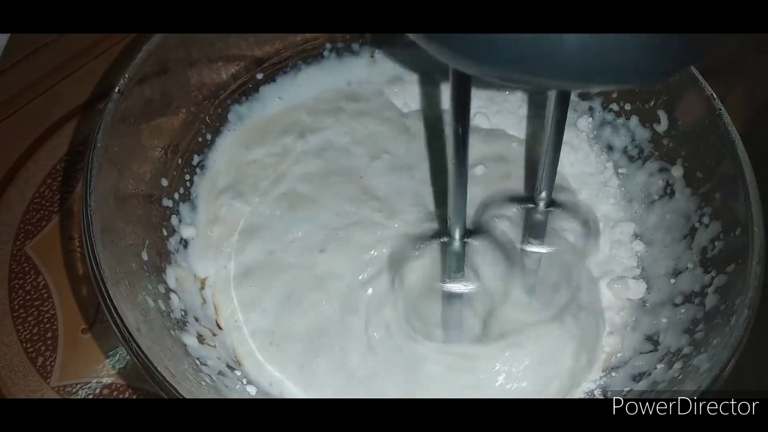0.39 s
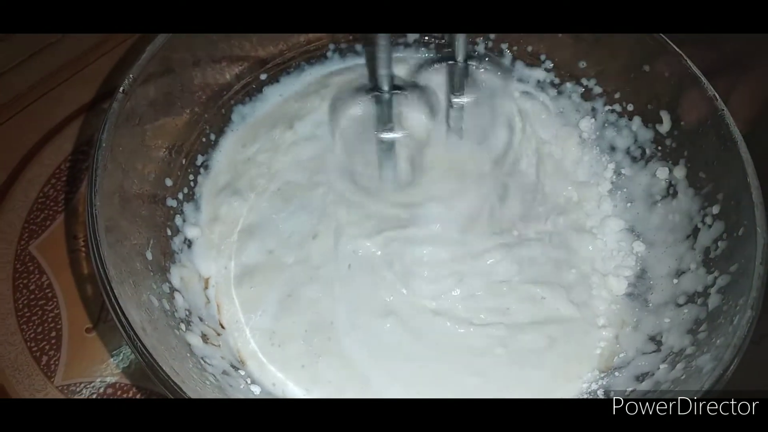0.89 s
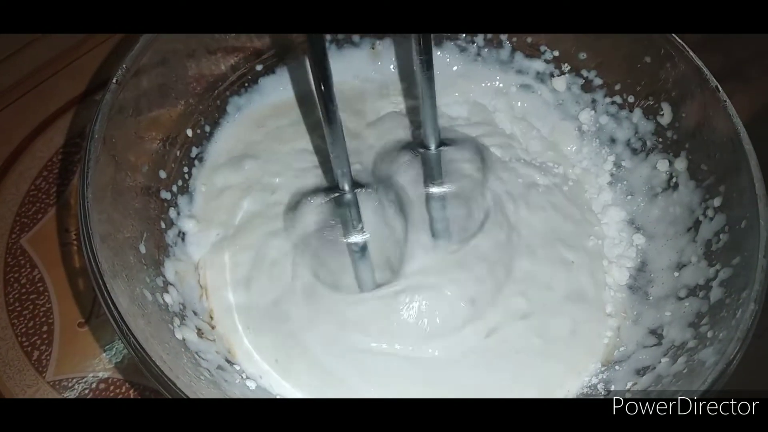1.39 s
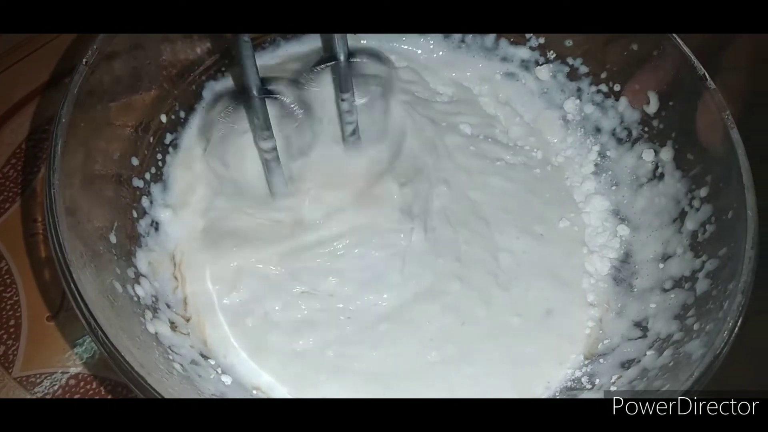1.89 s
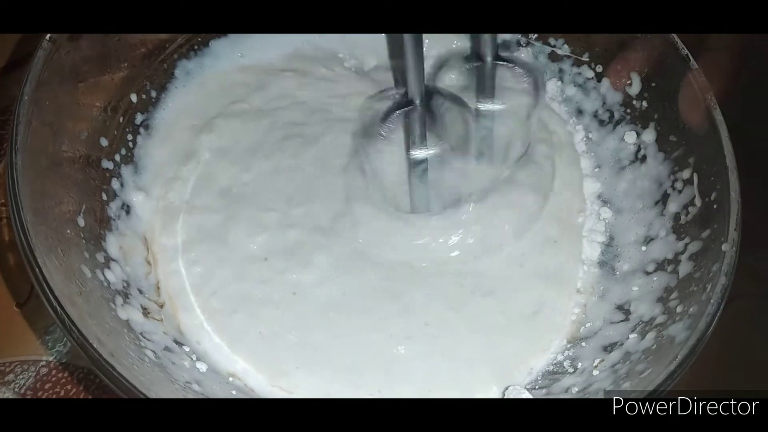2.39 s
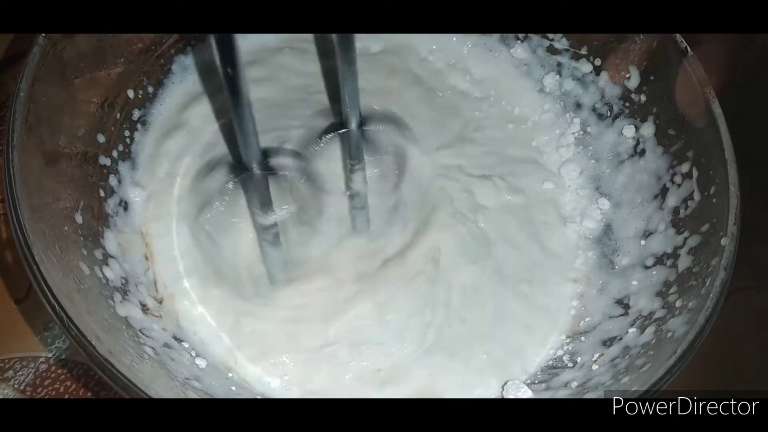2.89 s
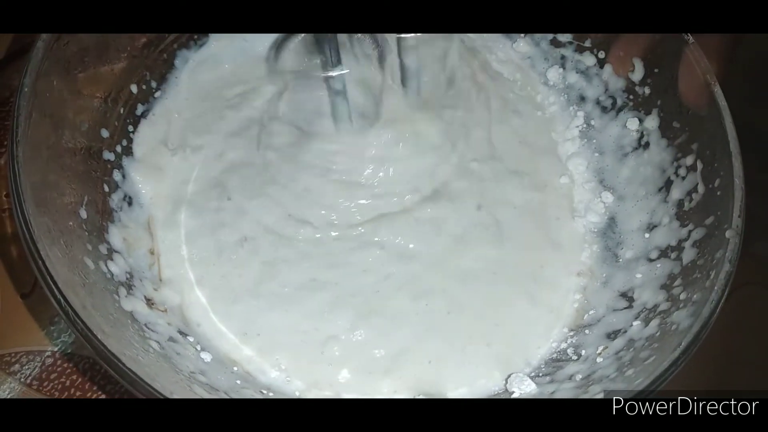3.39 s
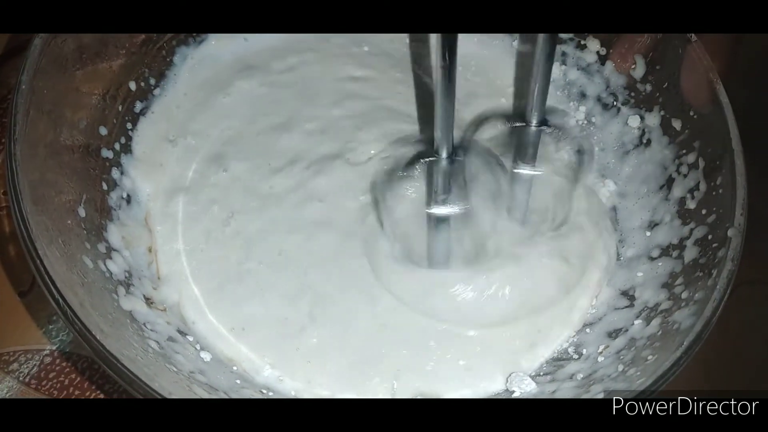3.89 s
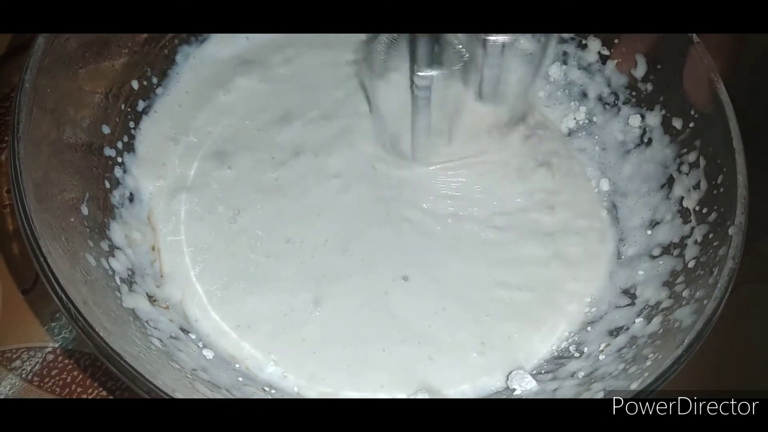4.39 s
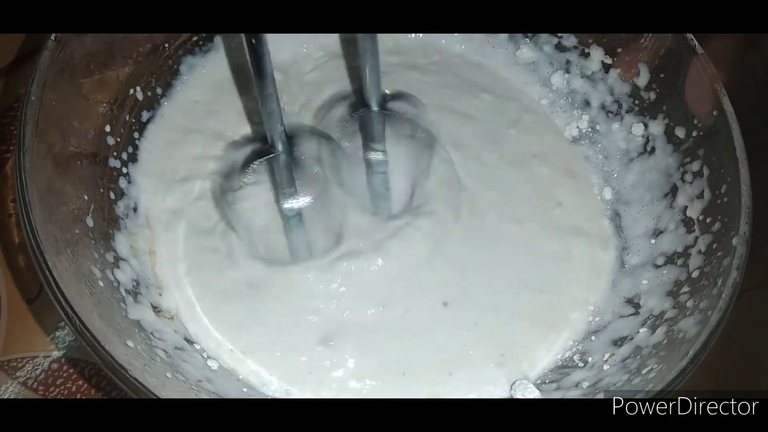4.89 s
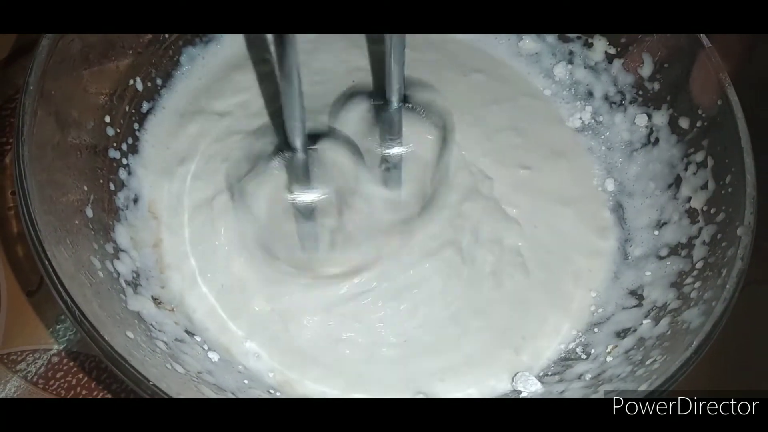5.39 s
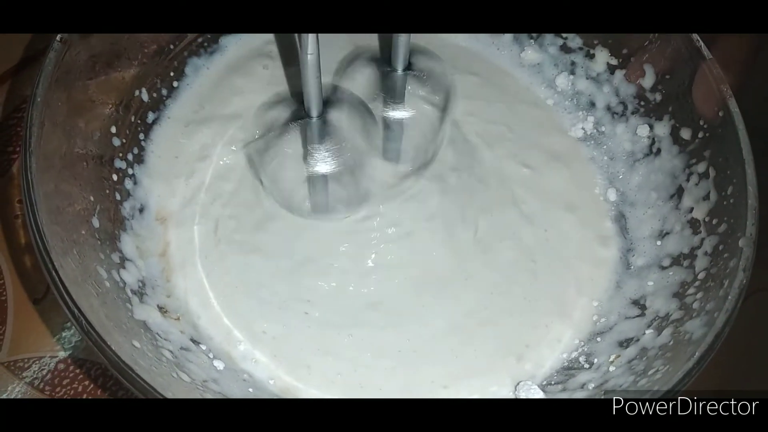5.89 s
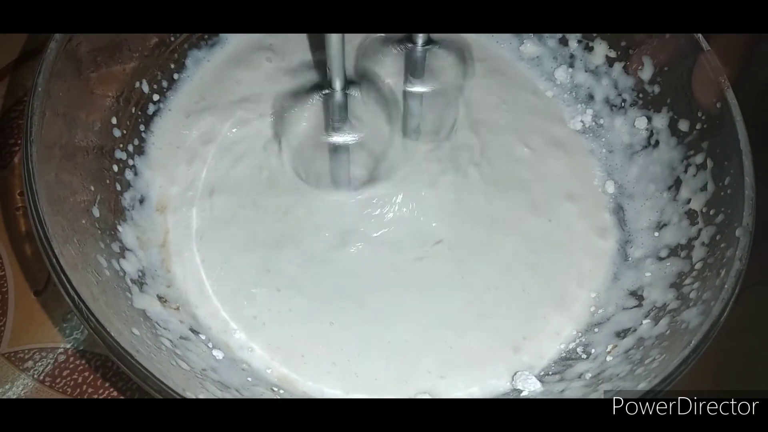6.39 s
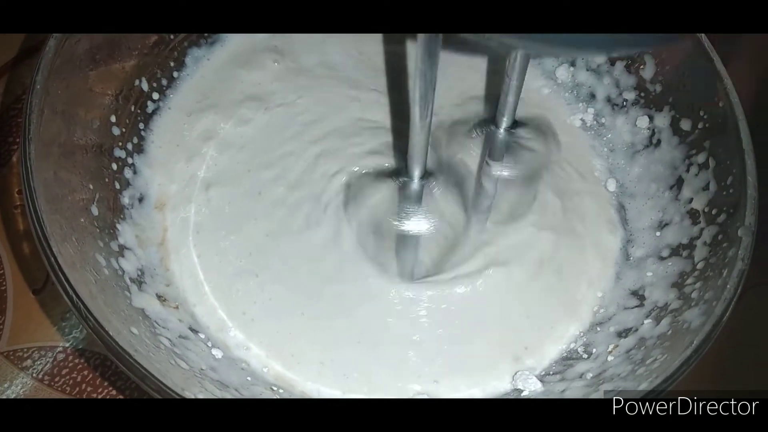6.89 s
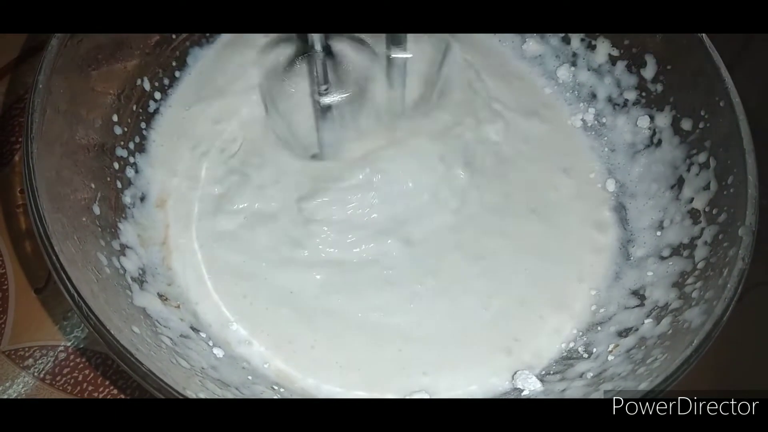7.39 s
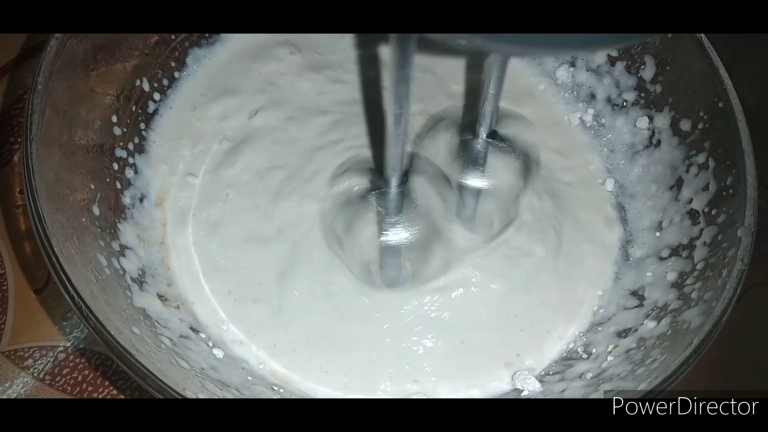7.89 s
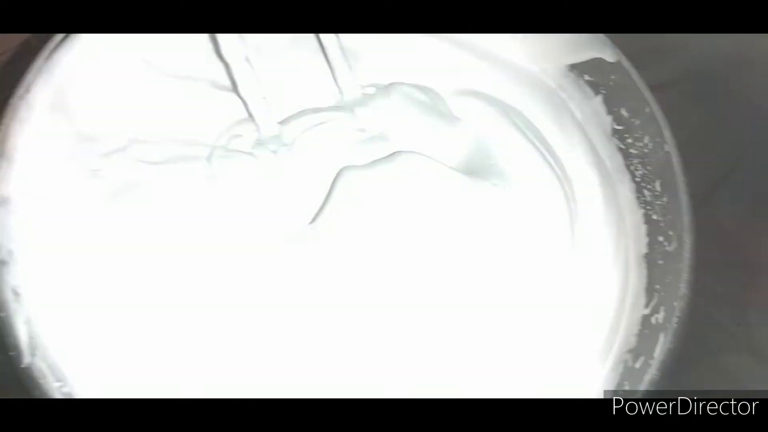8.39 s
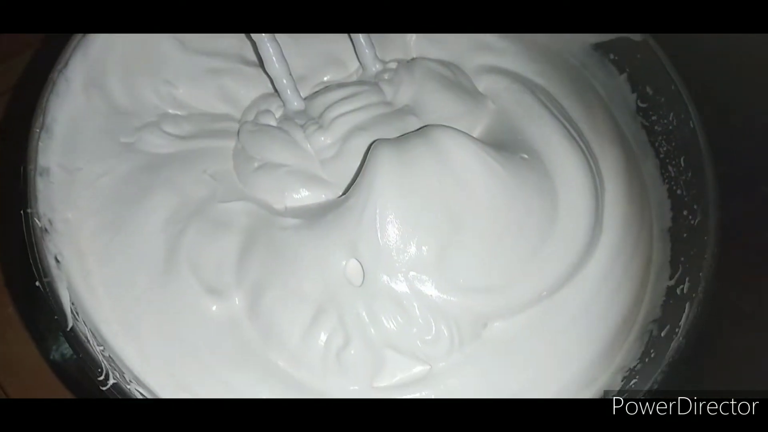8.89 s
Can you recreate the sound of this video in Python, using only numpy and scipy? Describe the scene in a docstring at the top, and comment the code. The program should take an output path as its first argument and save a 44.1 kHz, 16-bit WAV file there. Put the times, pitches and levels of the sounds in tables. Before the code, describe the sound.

Close electric mixer whirr with rapid beater rattle on a glass bowl, smoother whipping later, an abrupt stop, a silent gap, then quiet kitchen air.

```python
"""A kitchen: a hand mixer whips cream in a glass bowl close to a phone, then is cut to silence.
The motor is a stack of sines on shaft orders; cream, gears and fan are shaped noise.
Beater wires tick and knock on the glass (noise bursts, decaying modes) as the hand moves them round.
After the silence the quiet kitchen fades in: low-heavy noise on a slow pressure swing."""
import sys
import numpy as np
from scipy import signal
from scipy.fft import rfft, irfft, next_fast_len
from scipy.io import wavfile
from scipy.ndimage import uniform_filter1d, map_coordinates

SR = 44100
rng = np.random.default_rng(int(sys.argv[2]) if len(sys.argv) > 2 else 0)


def decibels_to_gain(level_db):
    """Convert a level in decibels to a linear amplitude gain (20 dB per decade)."""
    exponent = np.asarray(level_db, float) / 20
    return 10 ** exponent


def generate_wav(signal):
    """Clip the signal to [-1, 1] and save it as 16-bit WAV at the path in sys.argv[1]."""
    frames = np.transpose(np.atleast_2d(signal))
    scaled = np.clip(frames, -1, 1) * 32767
    pcm = np.round(scaled).astype(np.int16)
    wavfile.write(sys.argv[1], SR, pcm)


N = 397770
CUT_S, BACK_S = 8.112, 8.503  # mixer cut, kitchen in
GEAR = 20  # shaft turns per beater turn

# motor shaft speed: (t/s, f/Hz)
MOTOR_HZ = [(0, 316.5), (1.55, 316.8), (2.08, 313.8), (2.6, 314.4), (3.3, 312), (3.6, 312.6), (3.85, 311.6),
            (4.1, 312.8), (4.45, 316), (5.05, 312.5), (5.55, 310.5), (6.08, 312), (6.6, 318.3),
            (7.05, 319.4), (8.1, 318.9)]
# how hard the beaters stir: (t/s, level/dB)
STIR_DB = [(0, 0.5), (.35, 1), (.9, 2), (1.2, 0.5), (1.8, 0.5), (2.5, 1.5), (3, 0), (3.8, 0.5), (4.1, 3),
           (4.47, 2.5), (4.7, 0.5), (5.3, 2), (5.55, -.5), (5.9, -1.5), (6.5, -1), (7.05, 0.5), (8.1, 1)]
# left-right likeness of the mixer's noises: (f/Hz, correlation)
MIXER_ALIKE = [(60, 0.77), (150, 0.88), (380, 0.23), (950, 0.53), (2000, 0.64), (3000, 0.12), (6000, 0.14),
               (15000, .1)]
# glass bowl modes: (f/Hz, level/dB, t60/s)
BOWL_MODES = [(448, -12.5, 0.039), (540, 5.5, 0.072), (717, 1.5, 0.032), (821, 4, 0.046),
              (1124, 2.5, 0.026), (1294, -4.5, 0.029), (1527, 0, 0.041), (2083, -9, 0.043)]


def unit(x):
    """Scaled to rms 1."""
    return x / np.sqrt(np.mean(x ** 2) + 1e-20)


def along(points, hz):
    """(f/Hz, value) points interpolated on a log axis."""
    f, v = np.transpose(points)
    return np.interp(np.log(hz + 1), np.log(f + 1), v)


def curves(rows):
    """One value per sample for each column after the time."""
    s, *cols = np.transpose(rows)
    return [np.interp(np.arange(N) / SR, s, c) for c in cols]


def wobble(rate):
    """A smooth random curve, rate knots a second."""
    coarse = np.arange(0, N + 64, 64)
    knots = rng.standard_normal(int(N * rate / SR) + 4)
    return np.interp(np.arange(N), coarse, map_coordinates(knots, [coarse * rate / SR]))


def filtered(x, response):
    """x times a response of frequency."""
    m = next_fast_len(N + 8192)
    return irfft(rfft(x, m) * response(np.fft.rfftfreq(m, 1 / SR)), m)[..., :N]


def rush(gain, alike):
    """Stereo noise of rms 1; the mid/side split sets the left-right likeness."""
    def mid_side(hz):
        angle = np.arccos(np.clip(along(alike, hz), -1, 1)) / 2
        return gain(hz) * np.array([np.cos(angle), np.sin(angle)])
    mid, side = filtered(rng.standard_normal((2, N)), mid_side)
    return unit(np.array([mid + side, mid - side]))


def placed(times, db, sounds):
    """Each sound added at its time and level, in stereo."""
    out = np.zeros((2, N + sounds.shape[-1]))
    for s, g, sound in zip(times, decibels_to_gain(db), sounds):
        out[:, round(s * SR):][:, :sound.shape[-1]] += g * sound
    return out[:, :N]


def rung(tilt_db, modes, spread_db, detune, attack_s):
    """Blows of equal peak short-term rms ring the modes; higher modes reach the two ports more out of step."""
    t, out = np.arange(1024) / SR, np.zeros((len(tilt_db), 2, 1024))
    draw = rng.standard_normal((len(tilt_db), len(modes), 3, 1))
    for k, (hz, db, t60) in enumerate(modes):
        octaves = np.log2(hz / modes[0][0])
        strength = decibels_to_gain(db + tilt_db[:, None] * octaves + spread_db * draw[:, k, 0])
        size = strength * decibels_to_gain(-60 * t / t60) * (1 - np.exp(-t / attack_s))
        size = size * (1 - (t / t[-1]) ** 4)  # to zero at the end
        phase = 2 * np.pi * hz * (1 + detune * draw[:, k, 1]) * t
        skew = draw[:, k, 2] * min(hz / 3000, 1.5)
        out += np.stack([size * np.sin(phase + skew / 2), size * np.sin(phase - skew / 2)], axis=1)
    peak = np.sqrt(uniform_filter1d(out ** 2, size=128).mean(1).max(1))
    return out / peak[:, None, None]


def motor(turns):
    """Shaft orders that shift in level as load drags the shaft down, and mains beat tones beside the low ones."""
    # second and third order, gear, commutator, fan whine: (light-load level/dB, slope/dB per Hz of drag)
    upper_db = [(-43.5, 0.2), (-45.5, .5), (-45.5, -0.14), (-54, 0.06), (-64, 0.03)]
    # how the mixer is held: (t/s, vents toward phone/dB, gearbox toward phone/dB)
    held_db = [(0, 2.5, 2), (1.3, 1.5, -0.5), (2.2, 0, 2), (3.3, -1, -2), (4.6, 0.5, 1), (5.3, 2, 4.5),
               (5.9, 2, -1), (6.3, 3.5, -3), (6.75, 4.5, 7.5), (7.1, 5, -2), (7.4, 2, 4), (8.1, 4, 0.5)]
    # shaft orders of gear, commutator, fan whine
    whine_orders = 9, 24, 36
    # weaker orders: (order, level re whine/dB, whine followed: 0 gear, 1 commutator, 2 fan)
    weak_orders = [(4, -3, 0), (7, -6, 0), (12, -1, 1), (13, -11, 1), (16, -9, 1), (23, -7, 1), (25, -4, 1),
                   (31, -8, 2), (35, -3, 2)]
    # mains pull against shaft: (order, steps of twice mains rate, level re second order/dB)
    beat_tones = [(1, 1, -6), (2, 1, -3.5), (3, -1, -8), (3, 1, -4.5)]
    free_hz, mains_hz = 319, 50  # shaft under light load, supply
    wander_db = 1.6  # each order swells on its own as the hand turns the mixer

    drag_hz = free_hz - curves(MOTOR_HZ)[0]
    hum_db = -34 + .5 * drag_hz
    vents, gearbox = curves(held_db)
    sides = [vents, vents, gearbox, vents, vents]
    second, third, *whines = (db + slope * drag_hz + side + wander_db * wobble(2.52)
                              for (db, slope), side in zip(upper_db, sides))
    lines = [(1, 0, hum_db), (2, 0, second), (3, 0, third)]  # (order, mains steps, level/dB)
    lines += [(k, 0, db) for k, db in zip(whine_orders, whines)]
    lines += [(k, 0, db + whines[int(leader)]) for k, db, leader in weak_orders]
    lines += [(k, step, db + second) for k, step, db in beat_tones]

    mains_cycles = 2 * mains_hz * np.arange(N) / SR
    shaken = turns + .004 * wobble(30)

    def tone(k, step, db):
        flutter_db = (0.53 + 0.05 * k) * wobble(12)
        return decibels_to_gain(db + flutter_db) * np.sin(2 * np.pi * (k * shaken + step * mains_cycles))
    return np.sqrt(2) * sum(tone(*line) for line in lines)


def beaters(turns):
    """A wire meets the glass: a dry tick, a ringing rim and a bowl knock."""
    s, tick_db, knock_db, ring_db = contacts(turns)
    return knocks(s, knock_db) + ticks(s, tick_db) + rim_rings(s, ring_db)


def contacts(turns):
    """Time and tick, knock and ring levels of every wire that passes the point of contact."""
    # where on the beater's turn the longest wire meets the glass, as the hand moves: (t/s, position/turns)
    contact_turns = [(0, .853), (.38, .847), (.41, .514), (.7, .637), (.97, .769), (1.15, .827),
                     (1.35, .832), (1.6, .845), (1.9, .848), (2.1, .775), (2.27, .742), (2.35, .769),
                     (2.39, .876), (2.75, .827), (3.05, .849), (3.3, .822), (3.5, .771), (3.8, .636),
                     (4.05, .554), (4.3, .635), (4.62, .801), (4.8, .805), (5.1, .818), (5.45, .706)]
    # the four wires: lag behind the longest/turns
    wire_lags = 0, .31, .53, .79
    # three shorter wires: (share of clearance lost from tick, from knock)
    short_wires = [(2.4, 2.2), (1.1, .3), (2.3, 2.3)]
    # (t/s, longest wire's tick before trim/dB, shorter wires' clearance/dB, rim re tick before trims/dB)
    touch_db = [(0, -28.5, 7.5, -5), (.35, -34, 17, -2), (.45, -25, 5.5, -2), (.65, -30, 3, -2),
                (.75, -26.5, 1.5, 0.5), (.95, -25, 2.2, -1.5), (1.02, -27.5, 8, -12.5),
                (1.5, -27, 14, -3.5), (2, -24.5, 6.5, -15), (2.33, -27, 7.5, -3), (2.4, -31.5, 2, -8),
                (2.55, -26, 4, -5.5), (2.62, -26.5, 14.5, -7), (2.95, -29, 6.5, -6), (3.2, -30, 6, -22),
                (3.4, -26, 11.5, -7), (3.72, -28, 8, 0.5), (3.88, -37.5, 2, -6.5), (4.05, -23.5, 7.5, -3),
                (4.15, -26, 0.5, -5), (4.3, -21, 4, -4), (4.5, -23, 0.5, -1), (4.64, -28.5, 3, -5.5),
                (4.7, -22.5, 8.5, -13), (5.05, -27.5, 4.5, -7), (5.15, -31.5, 8.5, -12), (5.4, -26, 6, -12),
                (5.47, -38.5, 6, -8)]
    # hardest blows: (t/s, extra tick/dB, extra knock/dB)
    cracks_db = [(.965, 5, 0.5), (1.315, 4.5, 0.5), (1.633, 1, 1), (1.855, 0, 2), (1.948, 2, 3.5),
                 (2.073, -1, 4.5), (2.262, 3, 0.5), (2.586, 3.5, 4), (2.65, 1, 2.5), (2.712, -1.5, 2.5),
                 (2.873, 5, 4), (3.16, 1, 3.5), (3.351, 5, 0.5), (3.414, 7.5, 4), (3.476, 1.5, 2),
                 (4.299, 0, 0), (4.528, 0.5, 6), (4.596, 3, 4), (4.612, 3, 4), (4.647, 4.5, 2.5),
                 (4.689, -3, 2), (4.721, 3, 1.5), (4.817, 0.5, 1.5), (5.202, -0.5, 2), (5.264, 0.5, 4.5),
                 (5.323, 0, 5)]
    # blow-to-blow deviation: (tick/dB, knock/dB, ring/dB)
    scatter_db = 1.6, 1.1, 1.8

    end = round(touch_db[-1][0] * SR)
    past = np.maximum.accumulate(turns / GEAR - curves(contact_turns)[0])[:end]
    at = [np.flatnonzero(np.diff(np.floor(past - lag))) for lag in wire_lags]
    tick_share, knock_share = np.repeat([(0, 0), *short_wires], [len(a) for a in at], axis=0).T
    at = np.concatenate(at)
    strength, clearance, rim = (c[at] for c in curves(touch_db))
    extra = sum(np.outer(db, np.abs(at / SR - s) < .006) for s, *db in cracks_db)
    chance = scatter_db * rng.standard_normal((len(at), 3))
    tick = strength + extra[0] - tick_share * clearance + chance[:, 0]
    knock = -18.5 + 0.35 * (strength + 26)  # follows the tick's strength weakly
    knock = knock + extra[1] - knock_share * clearance + chance[:, 1]
    ring = tick + rim - 0.1 * tick_share * clearance + chance[:, 2]  # rim loses 1.1 dB per tick dB
    return at / SR, tick, knock, ring


def ticks(s, tick_db):
    """Wire on glass: noise bursts with a fast and a slower decay, partly shared by both channels."""
    # wire spectrum: (f/Hz, level/dB per Hz)
    wire_db = [(1800, -36.5), (2600, -15.5), (3500, -0.5), (4300, 2.5), (5100, -3), (6600, 3.5), (7300, 3),
               (9200, -7), (11500, -8), (15000, -9)]
    t = np.arange(1024) / SR
    decay = decibels_to_gain(-60 * t / 0.015) + 0.36 * decibels_to_gain(-60 * t / 0.076)
    grit = rng.standard_normal((len(s), 3, 1024)) * decay * (1 - np.exp(-t / 0.00038))
    grit = grit[:, :2] * 1.05 + grit[:, 2:] * 0.45
    return filtered(placed(s, tick_db + 4, grit), lambda f: decibels_to_gain(along(wire_db, f)))


def knocks(s, knock_db):
    """Bowl modes and, a moment after contact, a sharp push pulse."""
    # brighter nearer the bowl's wall: (t/s, tilt/dB per octave)
    bright_db = [(0, -2.5), (.7, 7.5), (1.4, -1.5), (2, 5), (2.6, 2), (3.3, 1.5), (3.9, 1.5), (4.3, 4),
                 (4.5, 8), (4.64, 14), (4.7, 1), (4.85, -0.5), (5.4, -2.5)]
    t = np.arange(1024) / SR
    lag = (t - .0012 - .0008 * rng.random((len(s), 1, 1))) / .00014
    push = 1.6 * (1 - lag ** 2) * np.exp(-lag ** 2 / 2)
    tilt_db = np.interp(s, *np.transpose(bright_db))
    bowl = rung(tilt_db, BOWL_MODES, spread_db=3.5, detune=.03, attack_s=.0004)
    return placed(s + .0003, knock_db, bowl + push)


def rim_rings(s, ring_db):
    """High modes of the glass rim."""
    # (f/Hz, level/dB, t60/s)
    rim_modes = [(8250, 0, .045), (10250, 0, .03), (11400, -10, .02)]
    return placed(s, ring_db - 3.5, rung(0 * s, rim_modes, spread_db=2, detune=.009, attack_s=.0008))


def churn():
    """Stirred cream: noise that follows how hard the beaters stir."""
    # churn spectrum: (f/Hz, level/dB per Hz)
    churn_db = [(12, -58.5), (20, -21), (264, -7), (290, -3), (318, -8), (363, -12), (455, -10), (582, -9),
                (627, -2), (676, -7.5), (949, -3.5), (1410, -10.5), (1800, -22.5), (2340, -46.5),
                (3960, -120)]
    level_db = -31 + curves(STIR_DB)[0] + 1.04 * wobble(15)
    return decibels_to_gain(level_db) * rush(lambda f: decibels_to_gain(along(churn_db, f)), MIXER_ALIKE)


def gear_roar():
    """Gear noise through the resonances of the plastic housing, summed with alternating sign."""
    # housing resonances: (f/Hz, width/Hz, level/dB)
    housing_modes = [(1547, 300, -11.5), (2001, 88, 3), (2705, 112, -9), (3734, 48, -20.5), (4200, 54, -33),
                     (4970, 77, -19.5), (5730, 170, -25.5)]
    # housing toward the phone: (t/s, roar before trim/dB)
    facing_db = [(0, -29.5), (.35, -30), (.8, -29.5), (1.1, -31), (1.74, -32.5), (2.11, -30), (2.56, -28.5),
                 (3.02, -33), (3.48, -29.5), (4.06, -28), (4.3, -30.5), (4.47, -27.5), (4.75, -33),
                 (5.17, -29.5), (5.54, -32.5), (5.91, -30), (6.5, -30.5), (6.75, -30), (7.05, -31),
                 (7.58, -29), (8.1, -32)]

    def shell(f):
        return sum((-1) ** k * decibels_to_gain(db) * 1j * f * w / (c * c - f * f + 1j * f * w)
                   for k, (c, w, db) in enumerate(housing_modes))
    level_db = curves(facing_db)[0] + 2.5 + 0.85 * wobble(25)
    return decibels_to_gain(level_db) * rush(shell, MIXER_ALIKE)


def fan_hiss():
    """Fan air noise, following the stirring at 0.61 dB per dB."""
    # hiss spectrum: (f/Hz, level/dB per Hz)
    hiss_db = [(1300, -40.5), (2300, -23), (2720, -5.5), (3450, -13.5), (4100, -11), (4640, -15.5),
               (5340, -17.5), (7590, -15), (8800, -21), (9600, -20.5), (11200, -22.5), (13000, -29),
               (15600, -20)]
    level_db = -38.5 + 0.61 * curves(STIR_DB)[0] + 1.1 * wobble(20)
    return decibels_to_gain(level_db) * rush(lambda f: decibels_to_gain(along(hiss_db, f)), MIXER_ALIKE)


def slaps(turns):
    """Away from the glass, every second wire pass slaps the cream and rings the bowl modes."""
    # slap strength: (t/s, level/dB)
    slap_db = [(5.5, -33), (6.8, -67), (7.05, -21.5), (7.3, -39), (7.6, -26), (7.8, -38), (8.1, -40)]
    wires = 4
    passes = turns * wires / GEAR
    at = np.flatnonzero(np.diff(np.floor(passes / 2)))
    at = at[at > slap_db[0][0] * SR]
    size_db = curves(slap_db)[0][at] + 4.3 * rng.standard_normal(len(at))
    return placed(at / SR, size_db, rung(0 * at, BOWL_MODES, spread_db=4, detune=.03, attack_s=.001))


def kitchen():
    """Far room noise fading in on a slow swing of pressure."""
    # fade-in: (t/s, level/dB)
    fade_db = [(8.5, -60), (8.68, -45), (8.696, -46), (8.776, -42), (8.946, -43), (8.99, -41), (9.02, -43)]
    # room spectrum: (f/Hz, level/dB per Hz)
    air_db = [(8.8, -26), (15, -16), (39, -14.5), (54, -19), (118, -21), (148, -12.5), (181, -21.5),
              (735, -20), (872, -25), (1130, -23), (1420, -29), (7250, -51.5), (14000, -69)]
    # left-right likeness: (f/Hz, correlation)
    air_alike = [(60, 0.92), (300, 0.92), (1400, 0.27), (3000, .05)]
    # pressure swing: (t/s, offset/full scale)
    drift = [(8.5, 0.00078), (8.53, 0.014), (8.62, .008), (8.7, -.004), (8.79, -0.011), (8.86, -0.0063),
             (9.02, -0.01)]
    air = decibels_to_gain(curves(fade_db)[0]) * rush(lambda f: decibels_to_gain(along(air_db, f)), air_alike)
    return (air + curves(drift)[0]) * (np.arange(N) / SR > BACK_S)


def scene():
    """The mixer, coloured differently at each port, until the cut; then the kitchen."""
    # left minus right: (f/Hz, level/dB)
    lean_db = [(60, -.5), (210, -1), (320, -7), (500, -.5), (1170, -.5), (1790, -2), (2740, 1.5),
               (4190, 3.5), (6410, 3.5), (9810, -6), (12500, -3), (15000, -1)]
    # left leads right: (f/Hz, phase/rad)
    lead_rad = [(60, 0), (780, -.2), (1810, -1.6), (2150, -.3), (2670, -1.8), (3270, .9), (4300, 1.9),
                (7000, 1.2), (12000, 1.2)]
    turns = np.cumsum(curves(MOTOR_HZ)[0]) / SR
    half = np.array([[.5], [-.5]])
    mixer = motor(turns) + beaters(turns) + churn() + gear_roar() + fan_hiss() + slaps(turns)
    mixer = filtered(mixer, lambda f: decibels_to_gain(half * along(lean_db, f)) * np.exp(1j * half * along(lead_rad, f)))
    gate = np.clip((CUT_S + .001 - np.arange(N) / SR) / 0.0018, 0, 1)
    return mixer * gate + kitchen()


def low_pass(x):
    """Removes everything above the highest recorded frequency."""
    return signal.sosfilt(signal.butter(12, 15400, fs=SR, output="sos"), x)


def record(dry):
    """The microphone's treble step, soft overload, the silent gap and offset jumps in the right channel."""
    # microphone response: (f/Hz, level/dB)
    mic_db = [(11700, -0.5), (12300, -18), (14000, -14.5), (15300, -24.5), (15900, -65)]
    # right channel's zero jumps and creeps back: (t/s, level/dB)
    jumps_db = [(0, -43), (.965, -26), (2.26, -23), (3.475, -23), (4.333, -27), (4.40, -23.5),
                (4.43, -26.5), (4.464, -28.5), (4.495, -32), (4.56, -26.5), (4.6, -28.5)]
    t = np.arange(N) / SR
    out = filtered(dry, lambda f: decibels_to_gain(along(mic_db, f)))
    out = out / (1 + np.abs(out / .75) ** 4) ** .25
    out *= (t < CUT_S + .003) | (t > BACK_S - .003)
    for s, db in jumps_db:
        out[1] += decibels_to_gain(db) * np.exp(-np.clip(t - s, 0, None) / 0.046) * (t >= s) * (t < CUT_S)
    return low_pass(out)


dry = scene()
out = record(dry)
generate_wav(out)
```